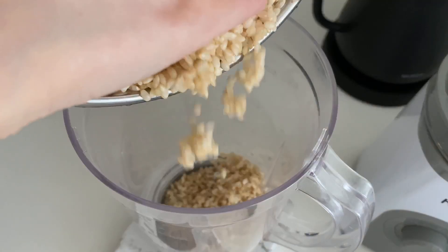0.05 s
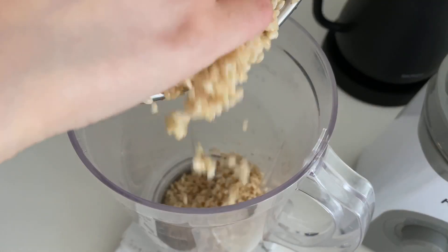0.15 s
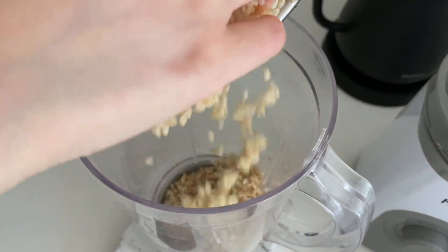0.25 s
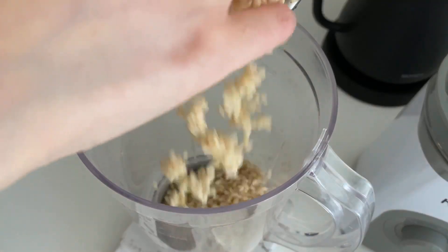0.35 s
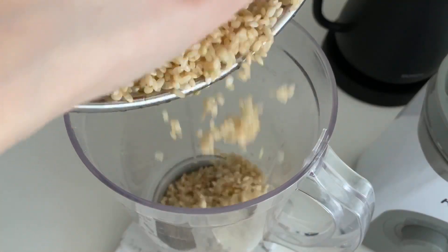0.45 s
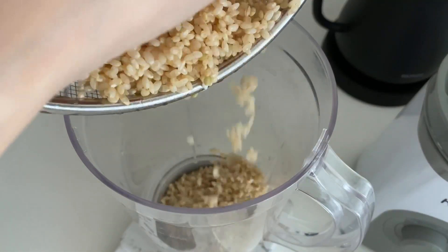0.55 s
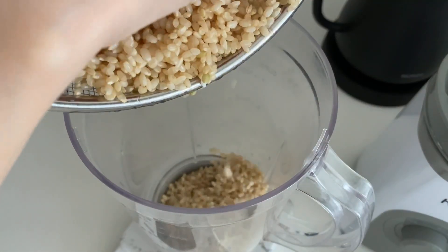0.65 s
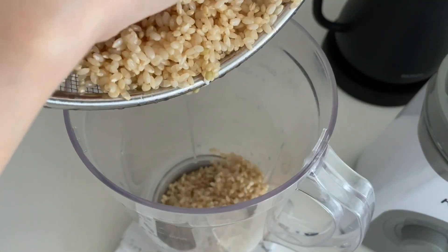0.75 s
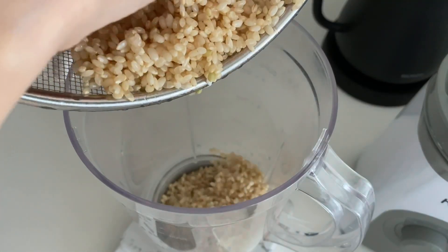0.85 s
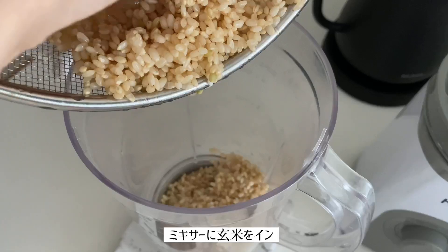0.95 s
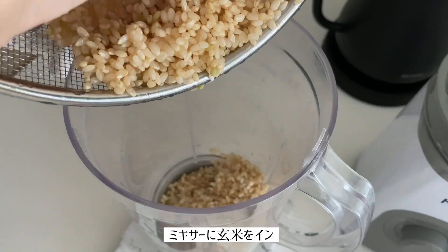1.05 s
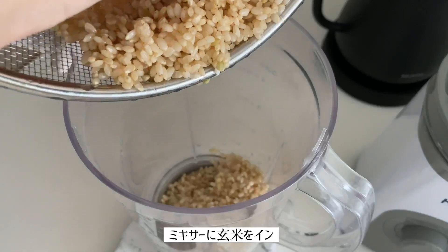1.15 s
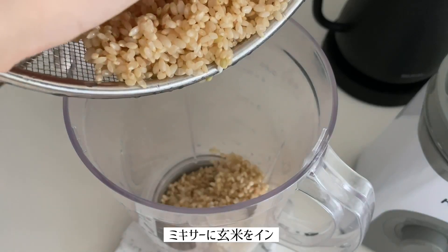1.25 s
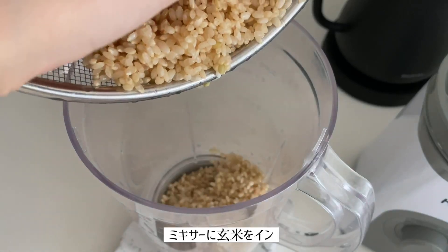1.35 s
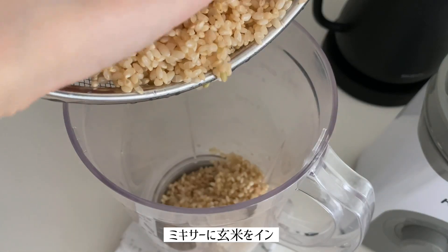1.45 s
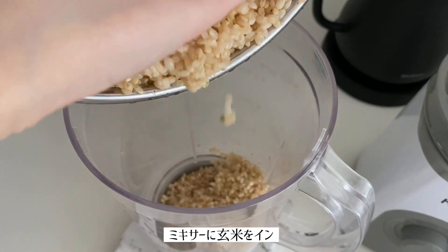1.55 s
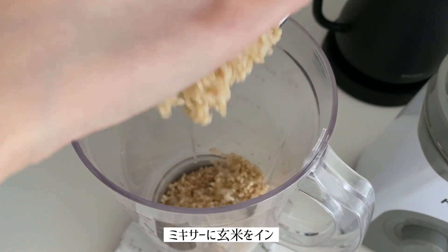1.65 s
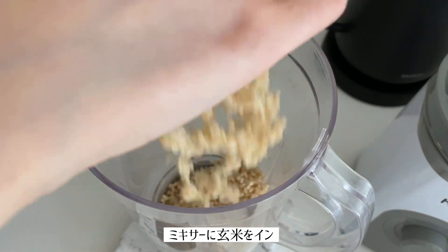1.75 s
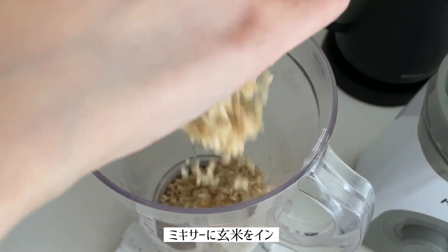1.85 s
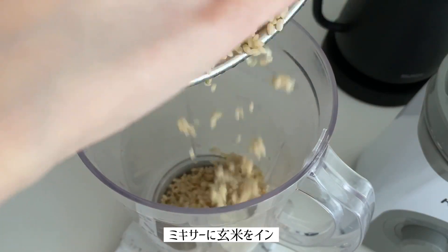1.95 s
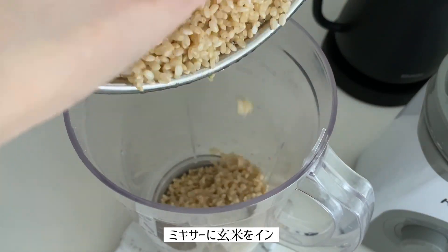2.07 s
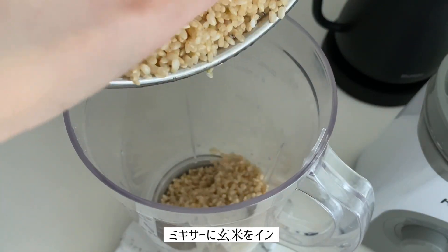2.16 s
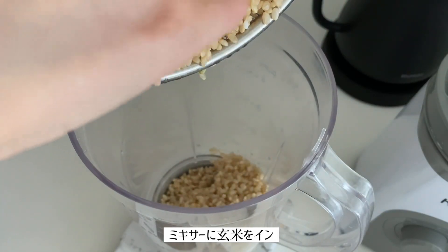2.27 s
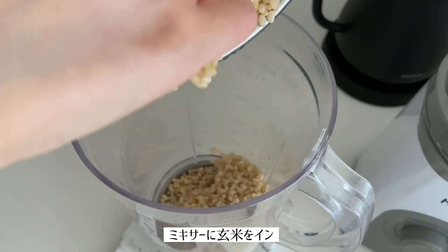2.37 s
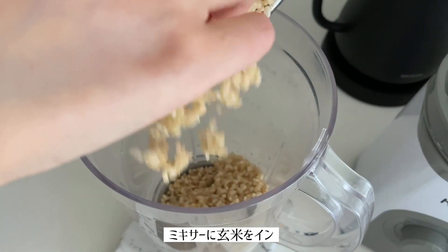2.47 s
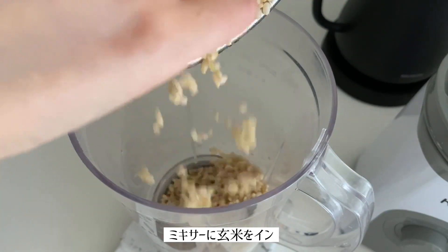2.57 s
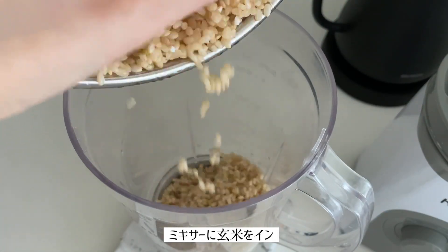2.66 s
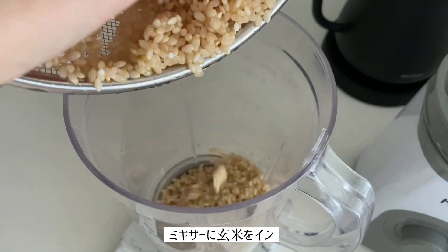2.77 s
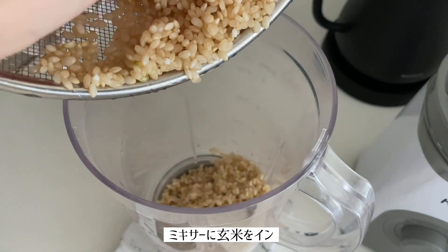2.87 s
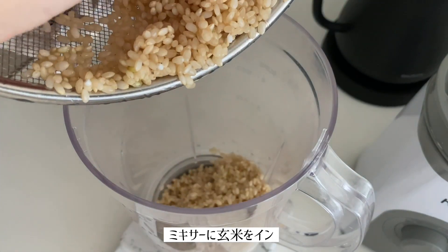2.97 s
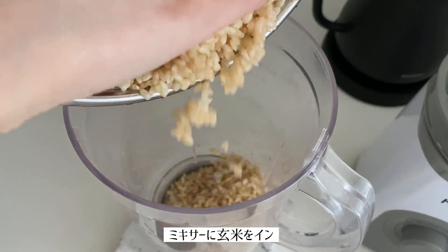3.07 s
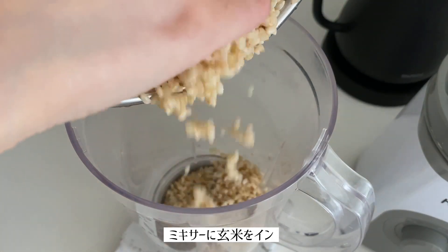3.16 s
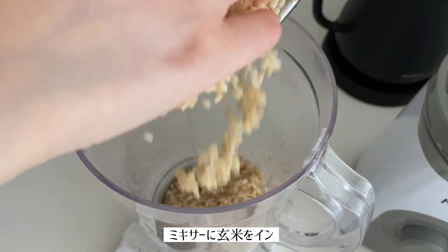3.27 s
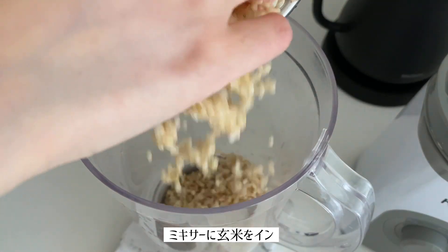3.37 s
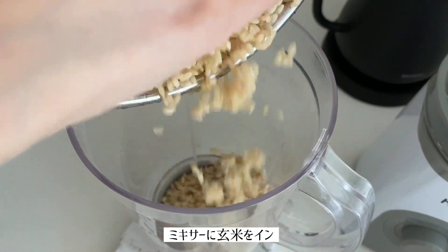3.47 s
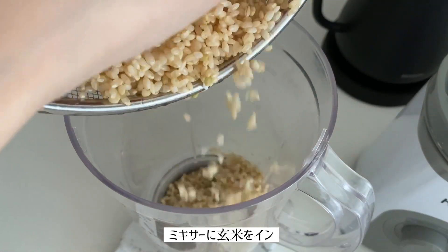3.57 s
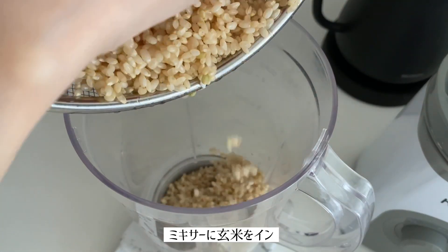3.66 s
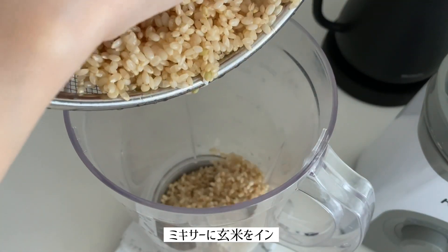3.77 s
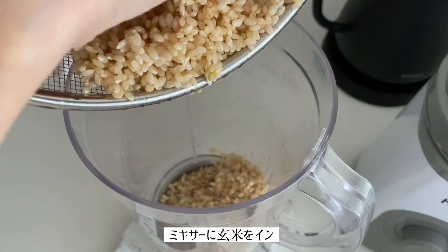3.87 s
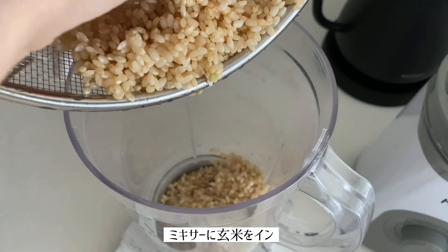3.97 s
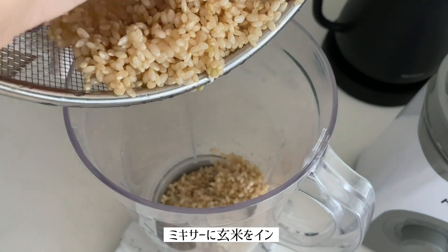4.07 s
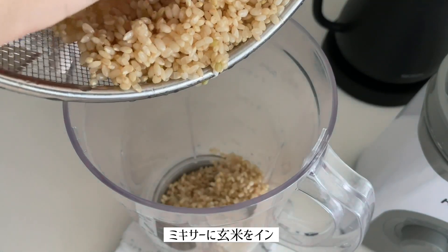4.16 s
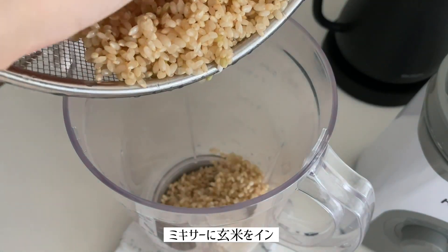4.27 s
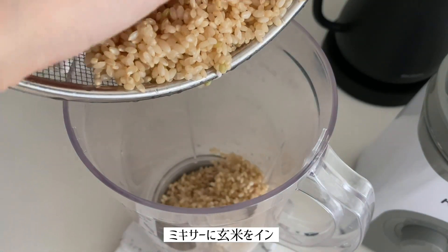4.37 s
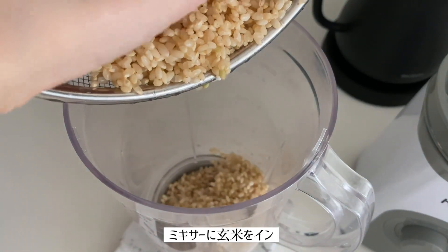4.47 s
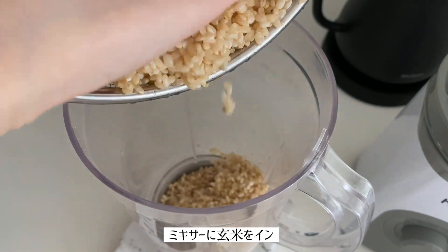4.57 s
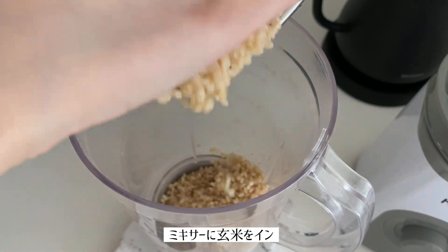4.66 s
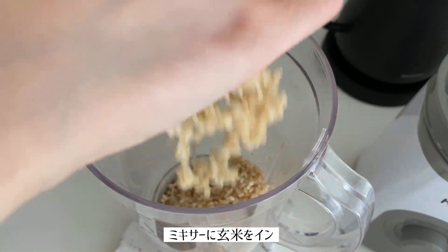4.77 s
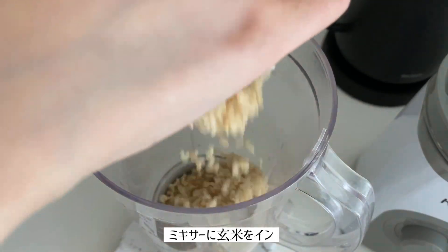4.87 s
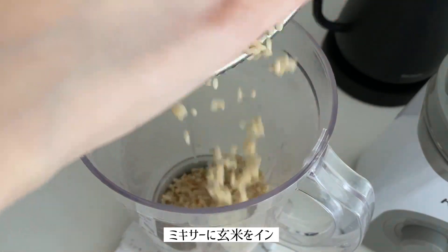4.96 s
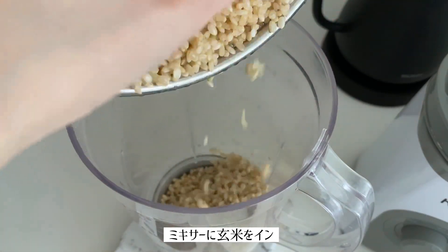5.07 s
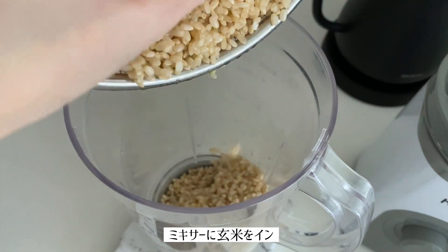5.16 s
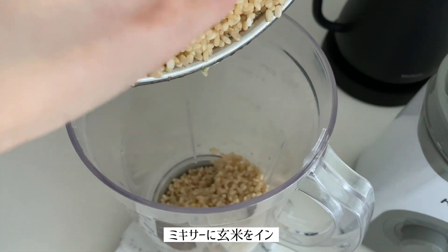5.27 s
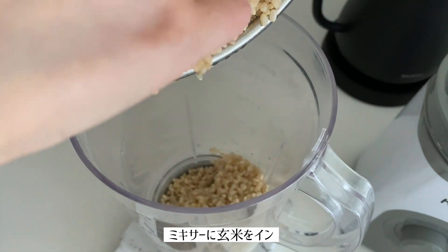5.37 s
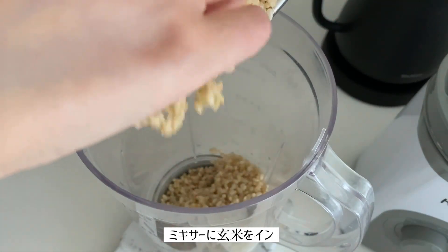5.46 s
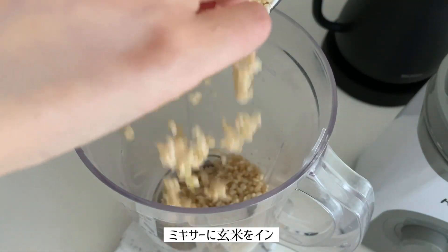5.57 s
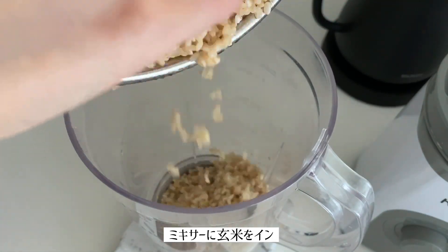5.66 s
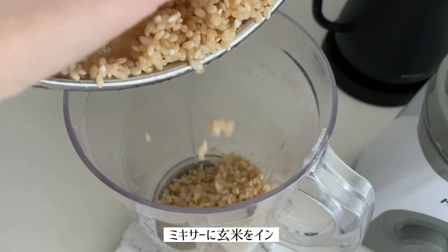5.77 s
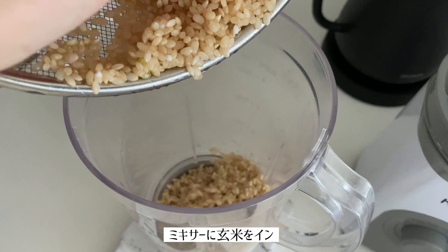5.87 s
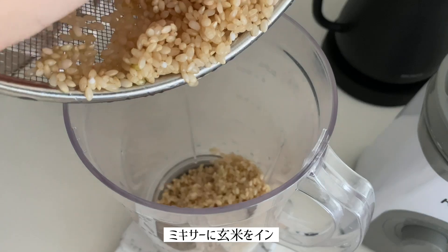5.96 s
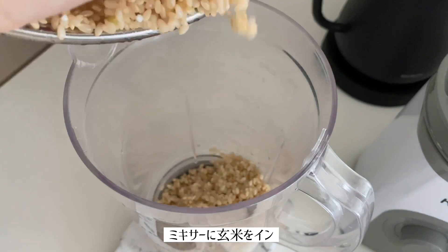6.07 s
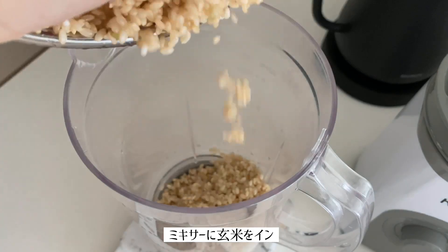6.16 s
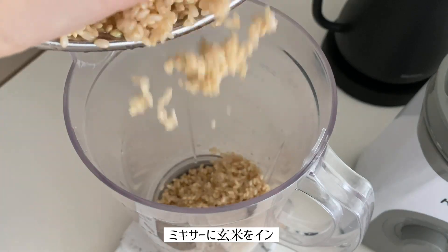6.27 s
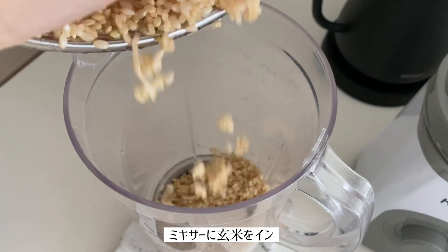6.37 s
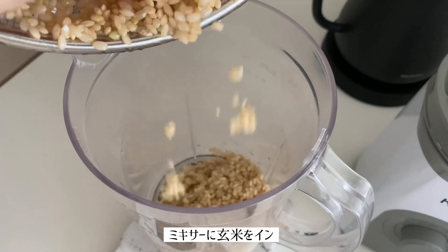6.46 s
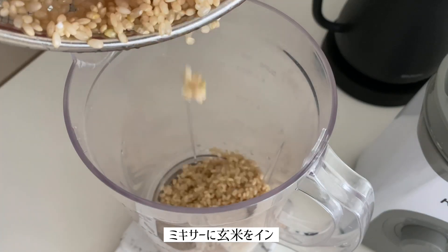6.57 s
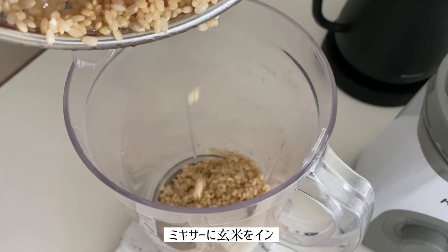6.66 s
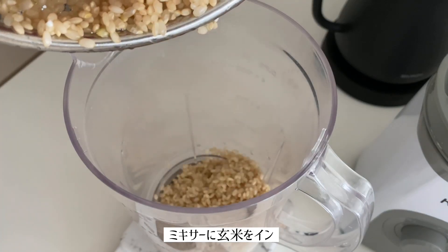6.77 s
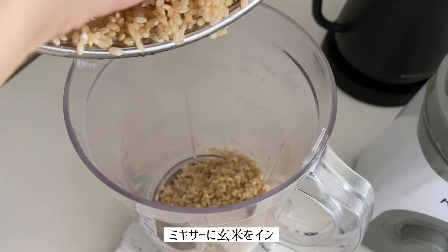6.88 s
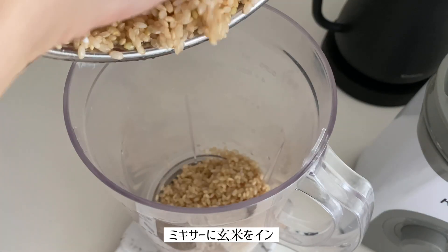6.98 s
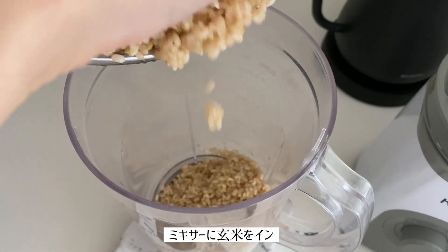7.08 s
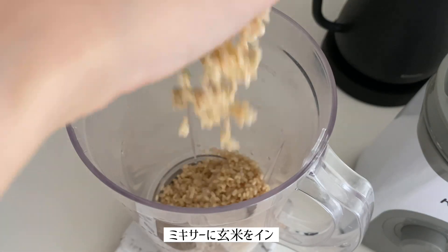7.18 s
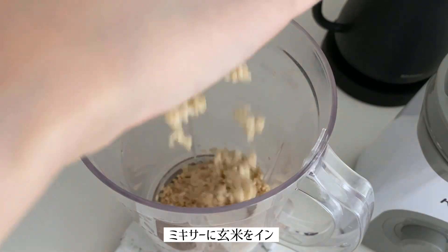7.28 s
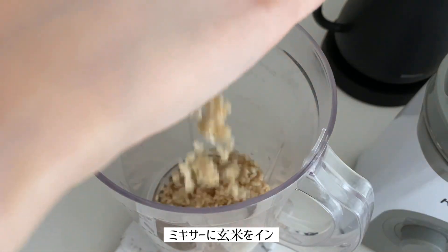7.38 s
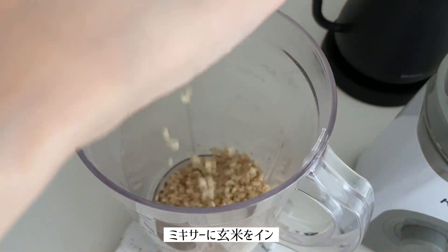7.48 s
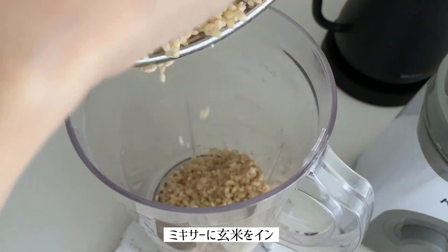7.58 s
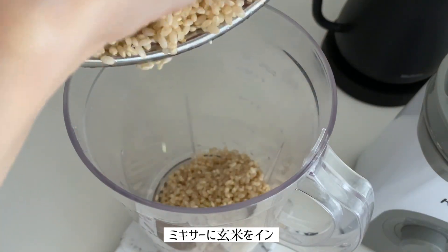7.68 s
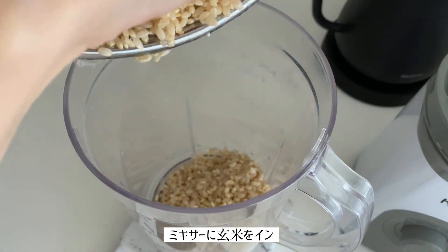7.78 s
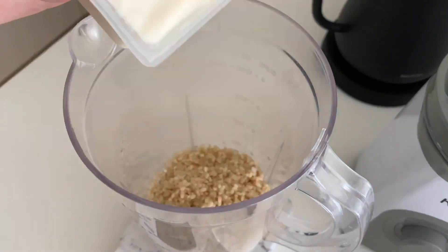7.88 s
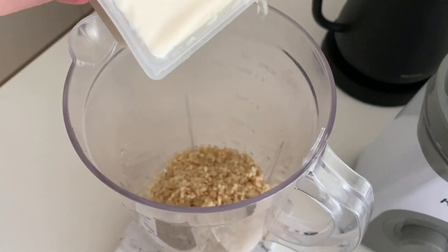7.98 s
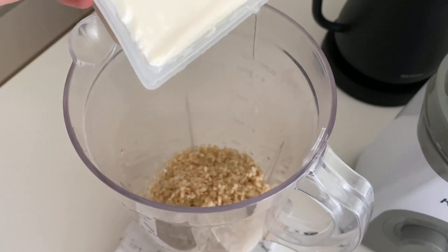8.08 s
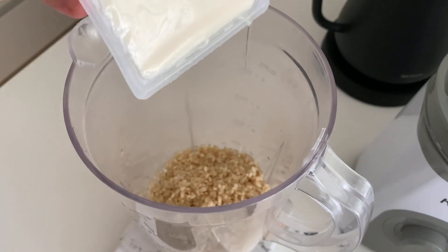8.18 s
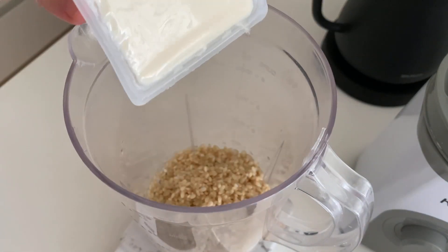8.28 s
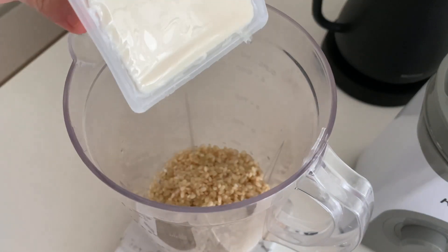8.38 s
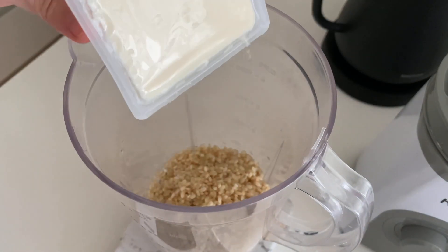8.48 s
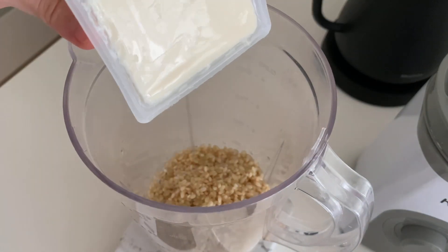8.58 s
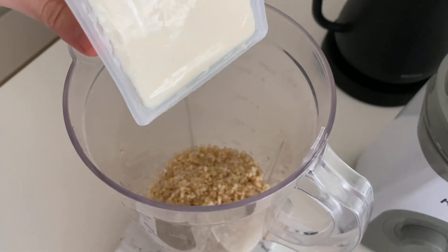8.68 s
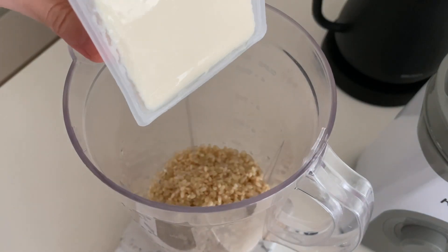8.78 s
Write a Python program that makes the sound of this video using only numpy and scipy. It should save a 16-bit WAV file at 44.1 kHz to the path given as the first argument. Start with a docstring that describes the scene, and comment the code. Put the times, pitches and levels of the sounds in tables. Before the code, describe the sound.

Close, stereo, in a quiet kitchen with low room tone and short reflections. From 0.2 to 0.7 s, wet rice drops into a plastic jug: a dense burst of crisp bright ticks, moist fizz and slight hollow resonance, strongest near 0.5 s. From 0.7 to 1.5 s, grains scrape and rustle softly on wire mesh. Further bursts fall at 1.8-2.1 s, with a soft low push on the counter, and at 2.6-2.9 s. The same sequence repeats exactly from 3.05 to 6.1 s. Lighter showers follow at 6.25-6.7 and 7.2-7.75 s, with faint mesh rustle and a barely audible falling squeak at 6.9 s between. At 7.84 s the scene cuts abruptly to a faint low appliance drone. Dull bumps come at 7.95 s, thin plastic film crackles at 8.15-8.4 s, and a distinct double tray knock near 8.7 s; the drone continues.

```python
"""Wet rice, pushed by a hand over the rim of a wire strainer, falls in clumps and grains into a plastic jug.
Each impact is a puff of noise, split into wall knock and wet fizz; showers on the heap also excite the jug's air.
Between pushes, random small impacts rustle on the mesh, coloured as ringing wires and as scraping grains.
The opening seconds are heard twice; after a cut two tones of an appliance, filtered from noise, drone
while a plastic tray is handled: film crackles, two dull knocks at 7.95 s and struck modes. Low pushes on the
counter sound both during the pouring and after the cut. Room tone and echoes surround all."""
import sys
import numpy as np
from scipy import signal
from scipy.fft import rfft, irfft, next_fast_len
from scipy.io import wavfile
from scipy.ndimage import uniform_filter1d

SR = 44100
rng = np.random.default_rng(int(sys.argv[2]) if len(sys.argv) > 2 else 0)


def wav_record(signal):
    """Record a signal, one row per channel, as 16-bit PCM in the file named by sys.argv[1]."""
    frames = np.transpose(np.atleast_2d(signal))
    bounded = np.clip(frames, -1, 1)
    # unit amplitude maps onto the largest positive 16-bit level
    quanta = np.round(bounded * 32767).astype(np.int16)
    wavfile.write(sys.argv[1], SR, quanta)


N = 389403  # length [samples]
AGAIN_S, CUT_S = 3.047, 7.84  # length of the repeated opening, time of the cut [s]

# spectrum of knocks on the plastic wall: (frequency [Hz], level [dB])
WALL = [(300, -19.5), (1400, -13), (2400, -2), (4300, 3), (6000, 1.5), (8000, -3), (9500, -3),
        (11000, -43.5)]
# modes of the air column in the jug: (frequency [Hz], level [dB], time to decay by 60 dB [s])
AIR = [(450, 0, .05), (560, -8, .03), (710, -4, .03), (870, -2.5, .043), (1250, -6, .04)]


def rice():
    """Superposition of impacts: ticks and patter through wall and fizz; the patter also drives the air."""
    # grains and clumps on the wall: (time [s], knock level [dB], fizz level [dB], time to peak [ms])
    tick_table = [(.054, -64.5, -47.5, .6), (0.0853, -64.5, -49.5, 1.4), (.105, -66, -55, 1),
                  (0.1726, -38.5, -29.5, 1.3), (0.1927, -36.5, -40, 1.9), (0.205, -37.5, -33, .9),
                  (0.2406, -32.5, -29.5, 1.3), (0.298, -41, -33, 1.9), (0.3319, -31.5, -29, 2),
                  (.3504, -31.5, -35, 1.6), (.369, -33.5, -33, 1.8), (.384, -31.5, -36, 1.4),
                  (.3946, -43, -29.5, .6), (.4606, -39, -51, 1.1), (.474, -27, -21.5, 1.4),
                  (0.5034, -30.5, -27.5, 1.2), (.5198, -36.5, -38, .9), (0.5726, -40, -46, 3),
                  (.6316, -40, -40.5, .8), (.654, -42, -44.5, 1.6), (.985, -52, -51, 1.5),
                  (1.110, -53.5, -47, .9), (1.7927, -65, -49, 3.4), (1.817, -40.5, -36.5, .4),
                  (1.827, -52, -33, .7), (1.848, -35, -34, 3.5), (1.859, -33, -32, 2),
                  (1.8863, -38.5, -28.5, .7), (1.9217, -36.5, -40, 1.5), (1.9606, -39.5, -43, .7),
                  (1.965, -36.5, -23, .8), (1.971, -33, -34, .7), (1.9769, -34.5, -37.5, 4.5),
                  (2.0089, -33, -38, 1), (2.037, -43.5, -42.5, 2), (2.063, -35, -31.5, 1.4),
                  (2.099, -52, -49, 1), (2.1746, -55, -47.5, 1), (2.4377, -54, -58, .8),
                  (2.573, -58, -46, 1.9), (2.5897, -36.5, -40, 1.8), (2.6152, -53, -32, .8),
                  (2.6373, -40, -40.5, 1.6), (2.6521, -37, -44, 2.9), (2.6684, -48.5, -34.5, 1.2),
                  (2.6874, -34, -54, .8), (2.701, -50.5, -43.5, 2.4), (2.7268, -41, -43.5, .7),
                  (2.7839, -38.5, -39.5, 1.9), (2.8117, -31, -25, 1), (2.8218, -30, -55, 1.1),
                  (2.9206, -43, -48.5, 1.1), (6.238, -59, -43.5, 1), (6.259, -50, -44, .7),
                  (6.3441, -38, -47, 2), (6.3983, -38, -43, 3), (6.43, -43, -47, 2.4),
                  (6.464, -33, -39, .5), (6.4866, -42.5, -59, 1.6), (6.5026, -38.5, -43.5, 1.6),
                  (6.5725, -38.5, -44.5, 1.2), (6.6, -40, -42, 2), (6.665, -54.5, -59, 1.5),
                  (6.7048, -59, -52, 2), (6.789, -42.5, -42.5, .9), (7.1551, -57, -49, 1.5),
                  (7.1924, -58, -45, 1.3), (7.2209, -60, -48.5, .6), (7.272, -67, -43.5, .9),
                  (7.2968, -50, -41, 1), (7.3385, -38.5, -45.5, 1.3), (7.3515, -39, -38.5, 1.3),
                  (7.3664, -39, -49, .7), (7.4117, -34.5, -38.5, 1), (7.477, -50, -48.5, 1),
                  (7.5058, -38.5, -38.5, 1), (7.5234, -45.5, -47.5, 1.6), (7.5403, -43, -50.5, 1),
                  (7.596, -34.5, -37.5, 1.4), (7.631, -37, -42.5, .8), (7.6372, -39.5, -37, .9),
                  (7.67, -38.5, -39, 1.1), (7.715, -45.5, -65, 1.4), (7.7625, -56, -45.5, .7)]
    # rice landing on the heap:
    # (start [s], patter level [dB], fizz level [dB], jug air level [dB], time to fade by 20 dB [s])
    shower_table = [(.17, -54, -54.5, -54, 0.32), (.3, -52.5, -49.5, -56, 0.22),
                    (.35, -44, -42, -49, 0.1385), (.405, -52, -52, -62, .15), (.462, -42, -41.5, -50, .1),
                    (.5, -42, -49.5, -61, 0.1475), (.56, -51, -51.5, -53, 0.1724),
                    (.74, -56.5, -60, -55, 0.094), (1.79, -50, -50, -55, .15), (1.828, -50, -50, -47, .08),
                    (1.845, -37, -39, -48, .16), (1.955, -40.5, -45, -51, .15),
                    (2.025, -43.5, -52, -58, .1), (2.06, -58, -58, -54, .05), (2.568, -52, -45, -54, .1),
                    (2.625, -42, -52, -53, 0.12), (2.81, -50.5, -53.5, -59, 0.084),
                    (6.255, -62, -54.5, -58.5, .07), (6.36, -57.5, -59, -61, 0.0455),
                    (6.405, -42, -46, -53, .14), (6.535, -47, -49.5, -55, 0.1259),
                    (7.275, -58.5, -47, -57, .08), (7.315, -43, -43, -53, 0.1575),
                    (7.42, -53.5, -49, -58, 0.118), (7.49, -55.5, -53.5, -60.5, 0.1854)]
    # heavy grains that sound a short note of the wall: (time [s], level [dB], nominal frequency [Hz])
    plink_table = [(.174, -39.5, 1577), (0.298, -42, 1498), (0.436, -46, 1523)]
    # spectrum of the wet fizz: (frequency [Hz], level [dB])
    fizz_spectrum = [(7000, -36), (8500, -13), (10500, -1.5), (12500, -2), (14500, -5.5), (15600, -4),
                     (16400, -45)]

    patter = grains(per_s=500, spread_db=4.0, ms=.59)
    knock, fizz, air_drive = (swells(shower_table, column=k, rise_s=0.01342) * patter for k in range(1, 4))
    for s, knock_db, fizz_db, ms in tick_table:
        hit = burst(ms)
        add(knock, s, amp(knock_db) * hit)
        add(fizz, s, amp(fizz_db) * hit)

    modes = ring(AIR, spread=.01)
    unit_modes = modes / np.linalg.norm(modes[0])
    notes = signal.oaconvolve(air_drive, unit_modes, axes=1)[:, :N]
    for s, db, hz in plink_table:
        add(notes, s, amp(db) * ring([(hz, 0, .04)], spread=0.0594))
    return colour(knock, WALL) + colour(fizz, fizz_spectrum) + notes


def mesh():
    """Resonance and friction: wet grains tick on wires that ring near 7 kHz, and scrape past one another."""
    # strokes of the hand through the rice:
    # (start [s], wire level [dB], scrape level [dB], time to fade by 20 dB [s])
    stroke_table = [(0, -69, -65, 0.12), (.68, -52, -56.5, 0.21), (.92, -52.5, -55.5, 0.4236),
                    (1.02, -56, -56, .2), (1.07, -52.5, -51, 0.2114), (1.15, -56.5, -55.5, 0.27),
                    (1.55, -65, -73.5, 1.32), (1.63, -62, -72, .12), (1.72, -64, -80, 0.46),
                    (2.16, -60, -62, .2), (2.26, -64, -70, .15), (2.4, -60.5, -81, 0.26),
                    (2.88, -72, -68, 0.3727), (6.2, -67, -83.5, 0.53), (6.79, -72.5, -66, 0.2544),
                    (7.03, -68, -74, .3), (7.13, -59, -68, 0.22), (7.705, -64, -57, .06)]
    # spectrum of the ringing wires: (frequency [Hz], level [dB])
    wire_spectrum = [(4000, -37), (5800, -10.5), (6400, -5.5), (6850, -2), (7400, -11), (8500, -15.5),
                     (15600, -22.5), (16200, -50)]
    # spectrum of grains scraping: (frequency [Hz], level [dB])
    scrape_spectrum = [(200, -1), (900, -3), (1600, -7.5), (3500, -5.5), (4900, -0.5), (5600, -5),
                       (10500, -6), (13000, -15), (15600, -24), (16200, -40)]
    # a faint falling tone: (start [s], end [s], first frequency [Hz], last frequency [Hz], level [dB])
    squeak = (6.895, 7.025, 5480, 4500, -78)
    rise_s = 0.0482

    wires = colour(grains(per_s=400, spread_db=6.0, ms=0.977), wire_spectrum)
    out = swells(stroke_table, column=1, rise_s=rise_s) * wires
    scrape = colour(grains(per_s=400, spread_db=5.0, ms=0.85), scrape_spectrum)
    out = out + swells(stroke_table, column=2, rise_s=rise_s) * scrape

    start, end, from_hz, to_hz, db = squeak
    hz = np.linspace(from_hz, to_hz, round((end - start) * SR))
    waver = 1 + .3 * evened(uniform_filter1d(rng.standard_normal(len(hz)), size=300))
    tone = np.sin(2 * np.pi * np.cumsum(hz) / SR)
    fade = signal.windows.tukey(len(hz))
    add(out, start, amp(db) * waver * tone * fade * [[1], [1]])
    return out


def tray():
    """Impulsive excitation: noise snaps, struck modes of tray and jug, low pushes on the counter."""
    # two dull knocks at 7.95 s, then film crackles:
    # (time [s], level [dB], centre frequency [Hz], time to peak before limits [ms])
    snap_table = [(7.946, -53, 2500, 1.57), (7.955, -54, 1884, 3.2), (8.157, -53, 14060, 1.55),
                  (8.198, -62.5, 4460, 2.35), (8.216, -53.5, 3930, 0.7), (8.235, -45.5, 11700, 0.317),
                  (8.299, -56, 5730, 1.02), (8.328, -66, 14000, 0.86), (8.345, -66, 7000, 1),
                  (8.415, -68, 11000, .5), (8.65, -66, 6500, 3)]
    # knocks on the tray: (time [s], level [dB])
    knock_table = [(8.558, -55), (8.681, -30), (8.689, -39)]
    # modes of the tray: (frequency [Hz], level [dB], time to decay by 60 dB [s])
    tray_modes = [(1720, 0, .022), (1901.4, -8, .06), (2852, -9, .03), (4010, -11, .03)]
    # the tray bumps the jug: (time [s], level [dB])
    jug_knock = (7.945, -34.5)
    # soft pushes of the jug on the counter, before and after the cut:
    # (time [s], level [dB], frequency [Hz])
    thud_table = [(1.99, -43.5, 53.2), (2.052, -57, 54.3), (7.955, -48.5, 45.6)]
    clack_db = -15  # noisy contact of a knock, relative to its ring
    lead = 441  # samples of silence ahead of a snap: the zero-phase filter also spreads backwards

    out = np.zeros((2, N))
    for s, db, hz, ms in snap_table:
        snap = np.pad(burst(ms), ((0, 0), (lead, 0)))
        spectrum = [(hz / 5, -22), (hz, 0), (hz * 1.88, -10), (hz * 5, -18)]
        add(out, s - lead / SR, amp(db) * colour(snap, spectrum))
    for s, db in knock_table:
        add(out, s, amp(db) * struck(tray_modes, ms=.2))
        add(out, s, amp(db + clack_db) * colour(burst(ms=1.1), WALL))
    s, db = jug_knock
    add(out, s, amp(db) * struck(AIR, ms=1.2))
    for s, db, hz in thud_table:
        t = np.arange(round(2.2 * SR / hz)) / SR  # 2.2 cycles
        push = np.sin(2 * np.pi * hz * t) * np.hanning(len(t))
        add(out, s, amp(db) * push * [[1], [0]])  # left path only
    return out


def kitchen(x):
    """Reverberation: reflections as noise that decays at its own rate in each band."""
    # decay: (frequency [Hz], time to decay by 60 dB [s])
    decay_table = [(300, 0.2054), (2500, 0.1676), (8000, 0.07), (16000, 0.041)]
    hz, t, z = signal.stft(rng.standard_normal((2, SR // 3)), SR, nperseg=128)
    f, t60 = np.transpose(decay_table)
    decay = amp(-60 * t / np.interp(hz, f, t60)[:, None])
    tail = signal.istft(z * decay, SR, nperseg=128)[1]
    tail = np.pad(tail / np.linalg.norm(tail[0]), ((0, 0), (150, 0)))  # reflections start 3.4 ms late
    return signal.oaconvolve(x, tail, axes=1)[:, :N]


def background():
    """Narrow-band noise: two drones after the cut, wavering in pitch more than in level, over room tone."""
    # drones: (centre frequency [Hz], width at half amplitude [Hz], level [dB])
    drone_table = [(90.6, 18, -55), (206, 30, -56)]
    # spectrum of the room tone: (frequency [Hz], level [dB])
    room_spectrum = [(25, -28), (45, 1), (100, -0.5), (200, -2), (330, -13), (1000, -17), (1500, -27),
                     (4000, -32.5), (8000, -46.5), (12000, -48), (16000, -70)]
    room_db = -60.5

    n = next_fast_len(N, True)
    after = np.arange(N) >= CUT_S * SR
    hz = np.fft.rfftfreq(n, 1 / SR)
    drone = 0
    for f, width, db in drone_table:
        resonance = 1 / (1 + ((hz - f) / width * 2) ** 2)
        noise = irfft(rfft(rng.standard_normal((2, n))) * resonance, n)
        band = signal.hilbert(noise)[:, :N]
        steadier = (band / abs(band) ** .7).real  # compresses the envelope, keeps the phase
        drone = drone + amp(db) * evened(steadier)
    room = amp(room_db) * colour(rng.standard_normal((2, N)), room_spectrum)
    return room + after * drone


def grains(per_s, spread_db, ms, count=20):
    """Poisson-like shot noise: random impacts of uneven size, drawn from a stock of bursts."""
    size = amp(spread_db * np.minimum(rng.exponential(1, N), 3)) * (rng.random(N) < per_s / SR)
    kind = rng.integers(0, count, N)
    total = 0
    for k in range(count):
        hits = (size * (kind == k))[None]
        total = total + signal.oaconvolve(hits, burst(ms), axes=1)[:, :N]
    return evened(total)


def burst(ms, bounce=0.4676, lumpy_db=4.0):
    """Impact noise with one echo: a lumpy puff along two paths and its return from the far wall."""
    u = np.arange(1500) / SR * 1000 / np.clip(ms, .2, 6)  # time over time to peak
    shape = u * np.exp(1 - u)
    # several grains land at once
    lumps = amp(lumpy_db * evened(uniform_filter1d(rng.standard_normal(1500), size=16)))
    echo = bounce * np.pad(shape, (110, 0))[:1500]  # 2.5 ms later
    return rng.standard_normal((2, 1500)) * evened(lumps) * (shape + echo)


def ring(modes, spread=0):
    """Modal synthesis: exponentially dying sines, detuned by the fraction spread on each of two paths."""
    t = np.arange(8000) / SR
    out = np.zeros((2, len(t)))
    for hz, db, t60 in modes:
        detune = 1 + spread * rng.standard_normal((2, 1))
        out += amp(db - 60 * t / t60) * np.sin(2 * np.pi * hz * detune * t)
    return out


def struck(modes, ms):
    """Contact-time filtering: a blunt blow of about ms milliseconds smooths the ring of a body."""
    push = np.hanning(round(ms * SR / 1000) + 3)
    return signal.oaconvolve(ring(modes, spread=.012), push[None] / push.sum(), axes=1)


def swells(rows, column, rise_s):
    """Power sum of overlapping envelopes: linear rise, exponential fade at each one's pace; the cut ends all."""
    t = np.arange(0, N / SR, .001)
    rows = np.array(rows)
    start, db, fade_s = rows[:, :1], rows[:, [column]], rows[:, -1:]
    age = np.maximum(t - start, 0)
    fade_db = 20 * np.maximum(age - rise_s, 0) / fade_s
    gain = np.minimum(age / rise_s, 1) * amp(db - fade_db)
    return np.interp(np.arange(N) / SR, t, np.linalg.norm(gain, axis=0) * (t < CUT_S))


def colour(x, points):
    """Linear filtering by a (frequency [Hz], level [dB]) spectrum; white noise keeps its power."""
    n = next_fast_len(x.shape[-1], True)
    hz = np.fft.rfftfreq(n, 1 / SR)
    f, db = np.transpose(points)
    response = evened(amp(np.interp(np.log(hz + 1), np.log(f), db)))
    return irfft(rfft(x, n) * response, n)[..., :x.shape[-1]]


def amp(db):
    """Decibel law: the amplitude ratio of a level."""
    return 10 ** (np.asarray(db) / 20)


def evened(x):
    """Normalisation to unit root mean square."""
    return x / np.sqrt(np.mean(x ** 2) + 1e-20)


def add(mix, s, sound):
    """Superposition: sums a sound into the mix from s seconds on."""
    part = mix[:, round(s * SR):][:, :sound.shape[1]]
    part += sound[:, :part.shape[1]]


def scene():
    """Direct sound, its reverberation and the background; the opening is then heard twice."""
    near = rice() + mesh() + tray()
    out = near + amp(-6.5) * kitchen(near) + background()
    n = round(AGAIN_S * SR)
    return np.concatenate([out[:, :n], out[:, :n], out[:, 2 * n:]], axis=1)


def record(dry):
    """Interchannel coherence: the right port shares some of the left path, phase-turned; then a low-pass."""
    # two microphone ports: (frequency [Hz], likeness [0-1], phase lead of the right [rad],
    # left over right [dB])
    port_table = [(29.97, 1, 0, 0.3), (251, 0.41, 0.78, 3), (1092, 0.14, -2.5, 2), (2300, 0.18, -3.5, 4),
                  (4120, 0.38, -5, 3.5), (6203, 0.28, -9, 3.5), (6470, 0.25, -7, 3), (9714, 1, -2, 0.5),
                  (17390, 1, 9, -1.5)]
    edge_hz = 16900
    n = next_fast_len(N, True)
    hz = np.fft.rfftfreq(n, 1 / SR)
    f, *columns = np.transpose(port_table)
    same, turn, db = (np.interp(hz, f, c) for c in columns)
    same = np.clip(same, 0, 1)
    left, other = rfft(dry, n)
    right = (same * left + np.sqrt(1 - same ** 2) * other) * np.exp(1j * turn)
    pair = irfft(np.array([left * amp(db / 2), right * amp(-db / 2)]), n)[:, :N]
    low_pass = signal.firwin(511, edge_hz, window=("kaiser", 9), fs=SR)
    return signal.oaconvolve(pair, low_pass[None], "same")


dry = scene()
out = record(dry)
wav_record(out)
```